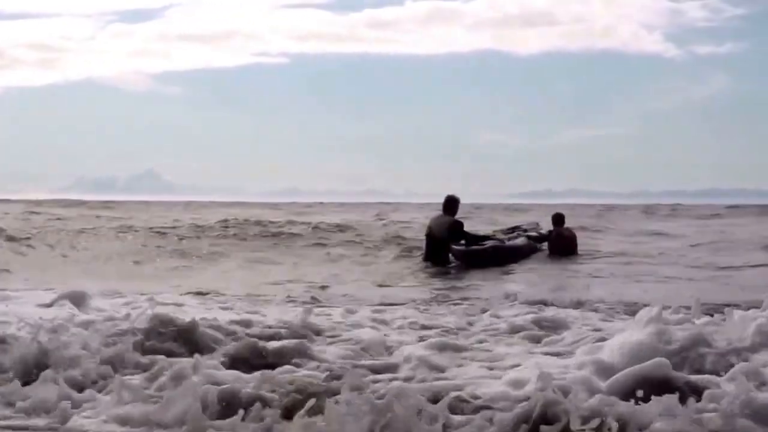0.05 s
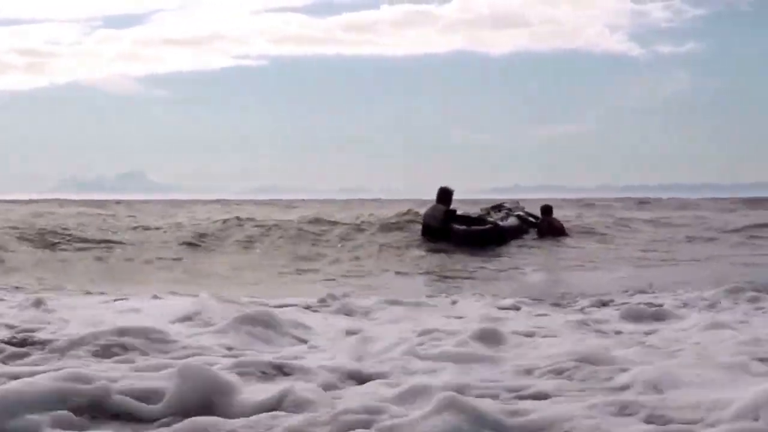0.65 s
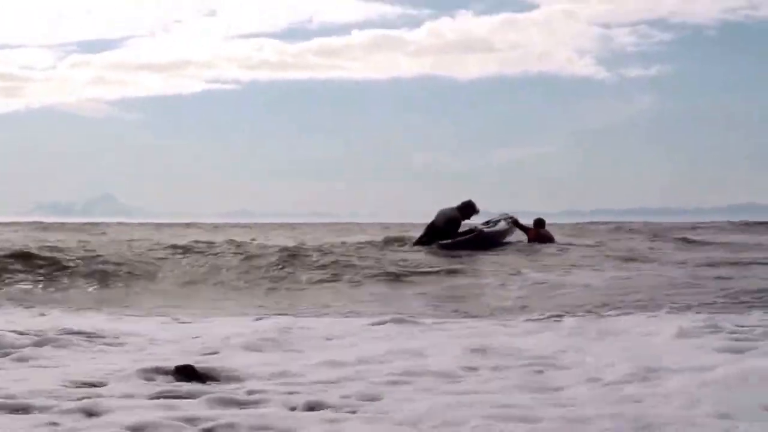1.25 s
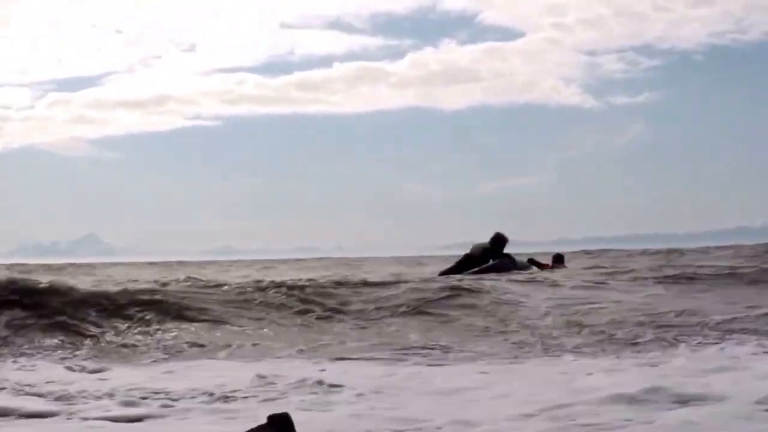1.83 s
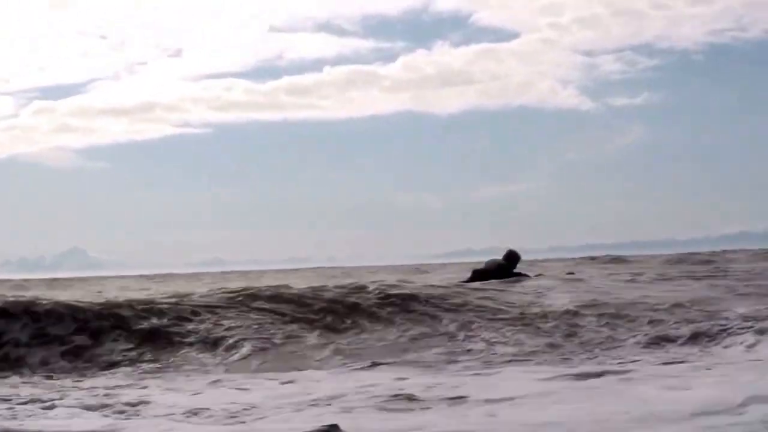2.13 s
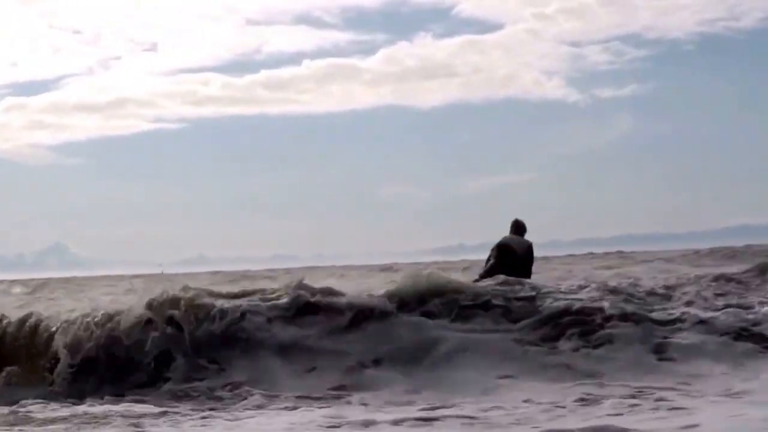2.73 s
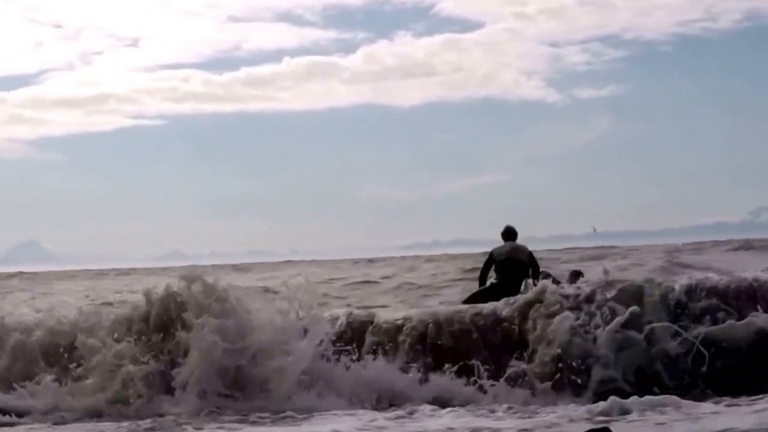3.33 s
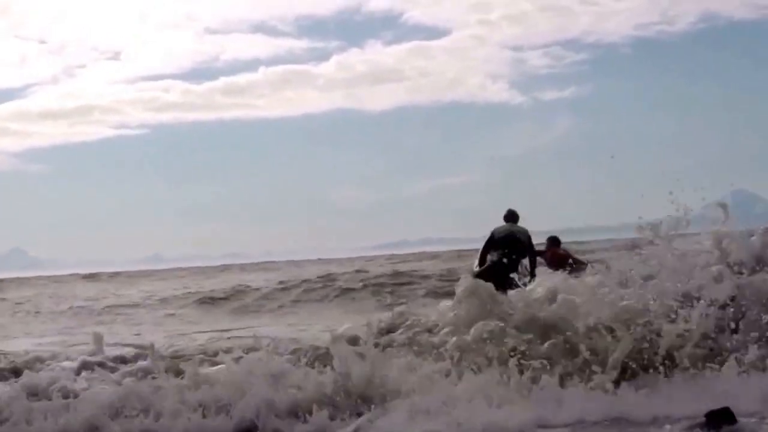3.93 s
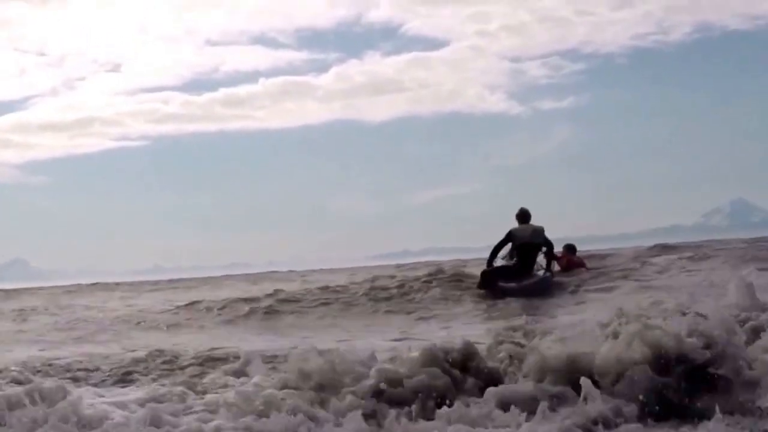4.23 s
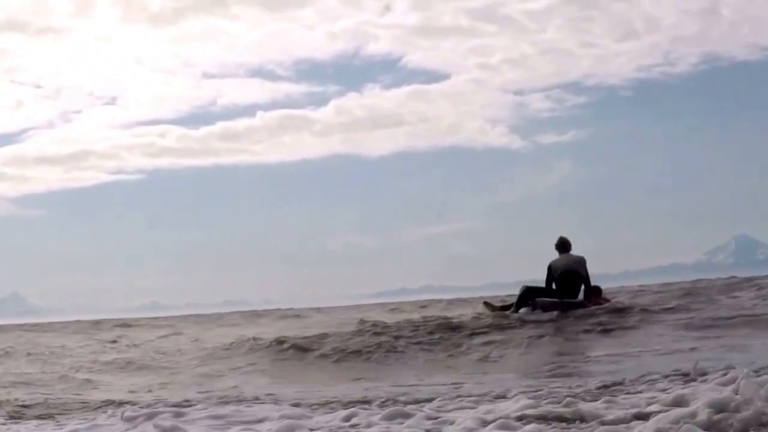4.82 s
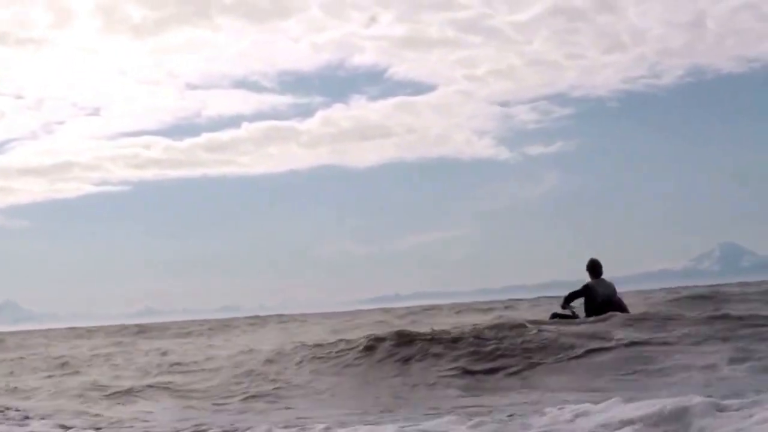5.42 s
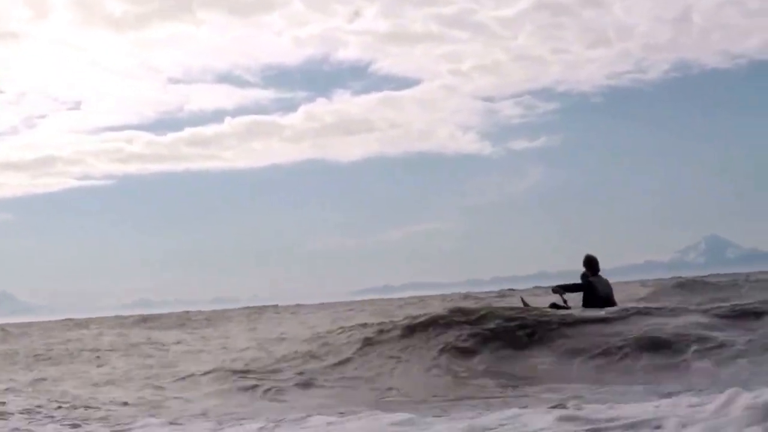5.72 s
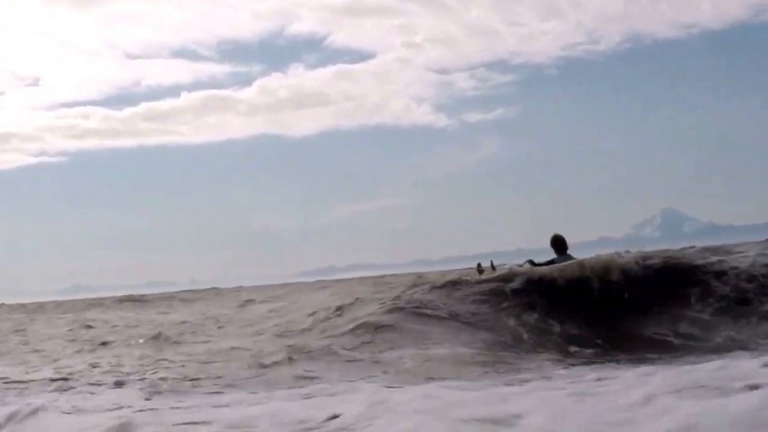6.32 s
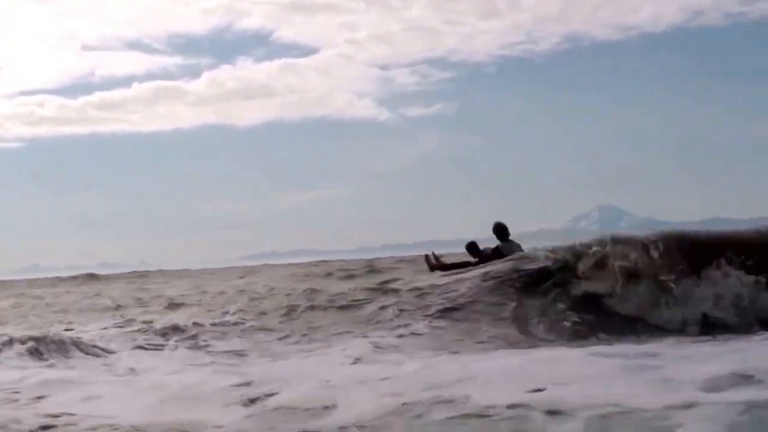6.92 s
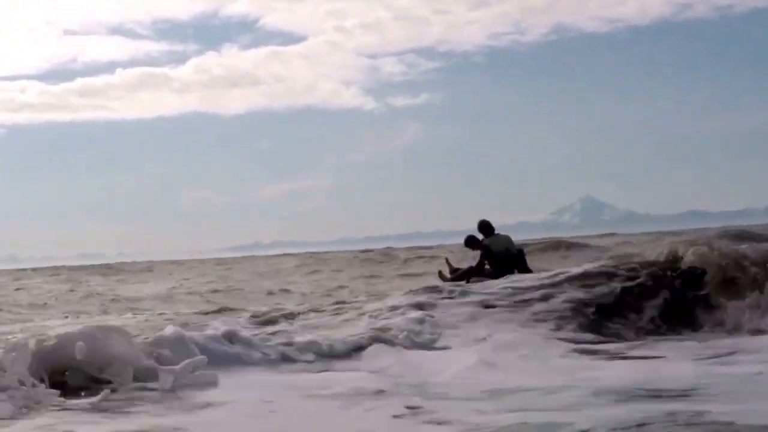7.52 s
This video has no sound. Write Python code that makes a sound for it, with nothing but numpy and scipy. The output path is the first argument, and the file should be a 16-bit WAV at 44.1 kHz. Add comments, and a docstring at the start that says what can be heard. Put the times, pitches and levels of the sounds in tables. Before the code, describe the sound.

Sea foam bubbles and washes through the shallows, heard from a microphone in a waterproof housing. Gusts add a deep rumble, and a hand knocks on the casing several times. About three seconds in, a wave curls and breaks close by, slaps down and slowly fizzes out. Three quick knocks follow, then another crest starts to spill. A thin hiss runs underneath.

```python
"""Shore break around a sea kayak, from a microphone in a waterproof housing down in the shallows.
Foam washes past, a mass of ringing bubbles, while gusts buffet the housing and a hand knocks on it.
About three seconds in, a wave curls and breaks close by, slaps down and slowly fizzes out.
Three quick knocks follow, and near seven seconds the next crest starts to spill.
The microphone hisses thinly throughout."""
import sys
import numpy as np
from scipy import signal
from scipy.fft import rfft, irfft, next_fast_len
from scipy.io import wavfile

SR = 44100
rng = np.random.default_rng(int(sys.argv[2]) if len(sys.argv) > 2 else 0)


def file_out(sig):
    """Save sig as 16-bit WAV at sys.argv[1]."""
    # one column per channel
    cols = np.atleast_2d(sig).T
    # limit, then scale
    lim = np.clip(cols, -1, 1)
    pcm = np.round(lim * 32767).astype(np.int16)
    wavfile.write(sys.argv[1], SR, pcm)


N = 337795
TIME = np.arange(N) / SR
FFT_SIZE = next_fast_len(N + 8192)
BIN_HZ = np.maximum(np.arange(FFT_SIZE // 2 + 1) * SR / FFT_SIZE, 1)


# Surges in the shallows: passing foam, the plunging wave, its spray and fizz, then the next crest.
# peak_s, level_db, rise_s, fall_s, pitch_hz, spread_octaves
SURGES = [(0.03, -50.5, 0.64, 0.85, 820, 2.07), (0.39, -56.6, 0.063, 0.48, 6280, .29),
          (1.18, -55.1, .89, 0.7, 850, 1.46), (1.54, -61, .31, 1.8, 5180, 0.84),
          (3.22, -46.3, 1.24, 1.02, 1273, 0.56), (3.45, -47, 0.51, 0.86, 2030, 0.39),
          (3.75, -48, 1.1, 1.3, 565, 1.15), (3.85, -58.5, 1.6, 0.23, 9700, .3),
          (4.0, -51.5, .6, 0.68, 3350, 0.98), (4.53, -52.5, 0.057, 0.76, 6000, 0.32),
          (4.71, -52.5, 0.55, 0.36, 1380, 1.64), (5.11, -53.5, .79, 0.3, 2800, 0.25),
          (5.53, -55.5, .16, 0.39, 4400, 0.99), (5.97, -62, .3, 3.6, 6030, 1.3),
          (6.821, -55, 0.14, 4.1, 1360, 0.49), (7.33, -51.5, .29, 4, 655, 1.12)]
# Bubble size classes, from deep churn to fine fizz; near_db sets the near bubbles against the far blur.
# low_hz, high_hz, tilt_db_per_octave, bubbles_per_s, ring_cycles, near_db
BUBBLE_SIZES = [(139, 660, -3, 200, 13, -13), (655, 1345, 0.1, 900, 13.2, -9),
                (1297, 2324, 0.4, 800, 8.9, -7.5), (2240, 2895, -3.5, 500, 12, -11.5),
                (2855, 3490, -5.5, 500, 8.7, -9), (3425, 4580, -5.5, 800, 9.8, -8.5),
                (4330, 7130, -1, 900, 15, -7), (7120, 10400, -14.5, 2500, 6.2, -9)]
# The steady wash of the sea all around, one value per bubble size: level_db
SEA_WASH = [-61.5, -62.5, -65, -65.5, -75, -68, -64, -67.5]

def surf():
    """Each surge stirs the bubble sizes near its own pitch, over a steady wash; their powers add."""
    surges = [(from_db(db) * swell(peak_s, rise_s, fall_s), pitch_hz, octaves)
              for peak_s, db, rise_s, fall_s, pitch_hz, octaves in SURGES]
    out = 0
    for (low_hz, high_hz, *texture), wash_db in zip(BUBBLE_SIZES, SEA_WASH):
        centre_hz = np.sqrt(low_hz * high_hz)
        surge_power = sum(level ** 2 * np.exp(-(np.log2(centre_hz / pitch_hz) / octaves) ** 2)
                          for level, pitch_hz, octaves in surges)
        loudness = np.sqrt(from_db(wash_db) ** 2 + surge_power)
        out += loudness * foam(low_hz, high_hz, *texture)
    return out


# Peaks and dips of the housing wall between surf and microphone: centre_hz, width_hz, gain_db
HOUSING_WALL = [(234, 60.0, -1.8), (451, 210.0, -2.5), (695, 50.0, -2.6), (739, 90.0, 2.5),
                (964, 60.0, 1.8), (1219, 150.0, 4.8), (1335, 60.0, -2.8), (1462, 110.0, 4.0),
                (1554, 50.0, -1.8), (1603, 130.0, 2.2), (2061, 170.0, 2.0), (2286, 100.0, -2.7),
                (2694, 380.0, 2.7), (3066, 160.0, 1.7), (3462, 270.0, -2.2), (4100, 440.0, 1.8),
                (5431, 270.0, 3.7), (5974, 270.0, -1.4), (6611, 560.0, 1.8), (7078, 310.0, -4.0),
                (7565, 280.0, 2.4), (8546, 850.0, 4.7)]

def foam(low_hz, high_hz, tilt_db_per_octave, bubbles_per_s, ring_cycles, near_db):
    """One size class of bubbles: near ones stand out of a blur of far ones, all heard through the wall."""
    near = from_db(near_db) * bubbles(low_hz, high_hz, bubbles_per_s, ring_cycles)
    far = rng.standard_normal(N)
    band_db = -10 * np.log10((1 + (low_hz / BIN_HZ) ** 36) * (1 + (BIN_HZ / high_hz) ** 36))
    tilt_db = tilt_db_per_octave * np.log2(BIN_HZ / low_hz)
    wall_db = sum(db / (1 + (2 * (BIN_HZ - hz) / width_hz) ** 2) for hz, width_hz, db in HOUSING_WALL)
    return coloured(near + far, band_db + tilt_db + wall_db)


def bubbles(low_hz, high_hz, bubbles_per_s, ring_cycles, pitch_count=10):
    """Bubbles of slightly uneven strength are born in loose clumps; each rings for a few cycles."""
    chance = rng.random(N)
    birth_rate = bubbles_per_s * from_db(1.5 * drift(rate_hz=9))
    births = np.flatnonzero(chance < birth_rate / SR)
    strengths = from_db(-0.5 * np.minimum(rng.exponential(1, len(births)), 4))
    strengths *= rng.choice([-1, 1], len(births))
    pitch_index = rng.integers(0, pitch_count, len(births))
    out = 0
    for k, hz in enumerate(np.geomspace(low_hz, high_hz, pitch_count)):
        clicks = np.bincount(births, strengths * (pitch_index == k), N)
        out += np.sqrt(hz) * unit_power(ring(clicks, hz, ring_cycles / hz))
    return unit_power(out)


# Lumps of water falling from the two crests: start_s, level_db, pitch_hz, decay_s
SLAPS = [(3.172, -44, 1200, 0.032), (3.2, -48, 1910, 0.017), (3.245, -43, 1270, .03),
         (3.43, -42, 1650, 0.025), (3.585, -46, 1220, 0.069), (7.255, -49.5, 1070, 0.041),
         (7.345, -49, 302, 0.035)]

def slaps(ring_cycles=14, rise_s=0.0035):
    """A falling lump of water traps a short burst of like-sized bubbles."""
    out = np.zeros(N)
    for start_s, level_db, pitch_hz, decay_s in SLAPS:
        age = np.maximum(TIME - start_s, 0)
        cloud = unit_power(ring(rng.standard_normal(N), pitch_hz, ring_cycles / pitch_hz))
        envelope = (1 - np.exp(-age / rise_s)) * np.exp(-age / decay_s)
        out += from_db(level_db) * cloud * envelope
    return out


# Single droplets close to the microphone: start_s, peak_db, pitch_hz
DROPLETS = [(0.199, -41, 3000), (1.28, -56, 4200), (1.5455, -45, 6060), (6.5406, -42, 2600),
            (6.686, -44, 4900), (6.7716, -40, 4640), (7.46, -46, 4700)]

def droplets(t60_s=0.0068):
    """Each droplet pings one tiny bubble."""
    return sum(from_db(peak_db) * ring(signal.unit_impulse(N, round(start_s * SR)), pitch_hz, t60_s)
               for start_s, peak_db, pitch_hz in DROPLETS)


# Smooth swells of wind pressure on the housing: peak_s, level_db, half_length_s
GUSTS = [(0.25, -20.5, .25), (0.852, -25.5, 0.23), (1.438, -23, 0.21), (2.066, -28.5, 0.2),
         (2.8, -24.3, 0.23), (3.055, -16.8, 0.14), (3.472, -24.5, 0.4), (4.117, -33, .1), (4.47, -24, 0.15),
         (5.59, -36, 0.063), (6.322, -34.5, 0.047), (7.03, -36, 0.051)]

def gusts(resonance_hz=22.2, wander=0.0697, lull_db=-43, waver_db=3.5):
    """Gusts pump a very low resonance of the housing, which wavers on faintly in the lulls."""
    lull = from_db(lull_db + waver_db * drift(rate_hz=5))
    swells = [from_db(db) * np.exp(-((TIME - peak_s) / half_s) ** 2) for peak_s, db, half_s in GUSTS]
    pitch_hz = resonance_hz * (1 + wander * drift(rate_hz=8.3))
    swing = np.sqrt(2) * np.sin(2 * np.pi * np.cumsum(pitch_hz) / SR)
    return swing * np.linalg.norm([lull, *swells], axis=0)


# The breeze over the water eases, freshens as the wave curls, then slackens: time_s, relative_db
BREEZE = [(0, -49), (1.7, -53.5), (3.2, -49.0), (4.6, -54), (7.66, -57.5)]
# The rumble of wind on the housing wall: frequency_hz, relative_db
BUFFET_SPECTRUM = [(20, -3.5), (32, 5.5), (52, 2), (64, 4.5), (78, -3), (92, -6.5), (115, -7), (150, -13.5),
                   (220, -28.5), (500, -53)]

def buffeting(gain_db=6.5, rise_s=0.026, fall_s=0.11):
    """The breeze buffets the wall, more so as the housing wobbles in the hand after a knock."""
    breeze = from_db(np.interp(TIME, *np.transpose(BREEZE)))
    wobbles = [from_db(wobble_db) * swell(start_s + rise_s, rise_s, fall_s)
               for start_s, *_, wobble_db in KNOCKS]
    rumble = coloured(rng.standard_normal(N), spectrum(BUFFET_SPECTRUM))
    return from_db(gain_db) * np.linalg.norm([breeze, *wobbles], axis=0) * rumble


# A hand on the housing, right at the microphone; wobble_db feeds the wind buffeting.
# start_s, tick_db, tick_cutoff_hz, rub_s, thud_db, thud_cutoff_hz, wobble_db
KNOCKS = [(0.2855, -24, 2780, 0.018, -18, 440, -49), (0.9574, -30.5, 2620, 0.0085, -29, 85, -38),
          (1.053, -38.5, 1200, 0.004, -39, 85, -51), (2.4114, -32, 2410, 0.0055, -37, 70, -42.5),
          (2.613, -36.5, 2400, 0.024, -26.7, 525, -48), (6.358, -34.5, 960, 0.0023, -34, 190, -52),
          (6.4037, -31, 860, .002, -34.5, 185, -48), (6.448, -26, 890, 0.0029, -30, 203, -46)]
# Resonances of the knocked housing: pitch_hz, gain_db, t60_s
HOUSING_MODES = [(64, -14, 0.19), (87.4, -3, 0.18), (112.6, -1, 0.12), (178, -11.5, 0.23),
                 (261.6, -5.5, 0.15), (304, -2.5, 0.062), (395.6, -10.5, 0.11), (604, -11.5, 0.067),
                 (744, -5.5, 0.054), (954, -5.5, 0.05), (1200, -3, 0.028), (1283, -2.5, 0.048),
                 (1343, 0, 0.022), (2080, -13, 0.019), (2440, -15, 0.022), (2880, -16, .02)]

def knocks(thud_lag_s=0.00186, rub_db=-26, tick_highpass_hz=380):
    """A touch ticks and rubs on the stiff wall; then the whole housing takes the soft push and thuds."""
    force = np.zeros(N)
    age = np.arange(SR // 8) / SR
    blow = signal.unit_impulse(len(age))
    for start_s, tick_db, tick_cutoff_hz, rub_s, thud_db, thud_cutoff_hz, _ in KNOCKS:
        rub = from_db(rub_db) * rng.standard_normal(len(age)) * np.exp(-(age / rub_s) ** 2)
        touch = filtered(blow + rub, 6, tick_cutoff_hz, "low")
        tick = from_db(tick_db) * filtered(touch, 4, tick_highpass_hz, "high")
        thud = from_db(thud_db) * filtered(blow, 3, thud_cutoff_hz, "low")
        for onset_s, push in (start_s, tick), (start_s + thud_lag_s, thud):
            start = round(onset_s * SR)
            force[start:start + len(age)] += push
    return sum((-1) ** k * from_db(gain_db) * ring(force, pitch_hz, t60_s)
               for k, (pitch_hz, gain_db, t60_s) in enumerate(HOUSING_MODES))


# The microphone's own noise: frequency_hz, relative_db
HISS_SPECTRUM = [(3000, -28), (8500, -16), (10000, -7), (10600, -2.5), (11400, -7.5), (11900, -6),
                 (12500, -2), (12950, 0), (13500, -3.5), (14200, -4), (15200, -10)]

def microphone_hiss(hiss_db=-64.6, whine_db=-62.9, whine_hz=12295, whine_width_hz=160):
    """Thin microphone hiss with a narrow, noisy whine on top."""
    hiss = coloured(rng.standard_normal(N), spectrum(HISS_SPECTRUM))
    whine_shape_db = -20 * np.log10(1 + ((BIN_HZ - whine_hz) / whine_width_hz) ** 2)
    whine = coloured(rng.standard_normal(N), whine_shape_db)
    return from_db(hiss_db) * hiss + from_db(whine_db) * whine


# Fine crackle of the electronics inside the housing: frequency_hz, relative_db
CRACKLE_SPECTRUM = [(9000, -30), (12000, -14), (12800, 0), (14200, -4), (15200, -10)]

def electronics_crackle(level_db=-70.3, pulse_hz=239.76, uneven_db=5.5):
    """Faint regular ticks from the electronics, each of a different size."""
    onsets = np.arange(0, N - 1, SR / pulse_hz).round().astype(int)
    sizes = from_db(uneven_db * np.clip(rng.standard_normal(len(onsets)), -2, 2))
    ticks = np.bincount(onsets, sizes * rng.choice([-1, 1], len(onsets)), N)
    return from_db(level_db) * coloured(ticks, spectrum(CRACKLE_SPECTRUM))


def from_db(db):
    """Decibels to gain."""
    return 10 ** (np.asarray(db) / 20)


def unit_power(x):
    """Scale to a mean square of 1."""
    return x / np.sqrt(np.mean(x ** 2) + 1e-20)


def spectrum(points):
    """Join (frequency_hz, relative_db) points on a log-frequency axis."""
    hz, db = np.transpose(points)
    return np.interp(np.log(BIN_HZ), np.log(hz), db)


def coloured(x, curve_db):
    """Shape a steady sound's spectrum and return it at unit power."""
    return unit_power(irfft(rfft(x, FFT_SIZE) * from_db(curve_db), FFT_SIZE)[:N])


def filtered(x, order, cutoff_hz, kind):
    """A low-pass or high-pass with a flat passband."""
    return signal.sosfilt(signal.butter(order, cutoff_hz, kind, fs=SR, output="sos"), x)


def drift(rate_hz):
    """Slow random wandering at unit power."""
    return coloured(rng.standard_normal(N), -40 * np.log10(np.hypot(1, BIN_HZ / rate_hz)))


def ring(clicks, pitch_hz, t60_s):
    """A unit click starts a sine of height 1 that falls 60 dB in t60_s."""
    decay = from_db(-60 / (t60_s * SR))
    step = 2 * np.pi * pitch_hz / SR
    return signal.lfilter([0, np.sin(step)], [1, -2 * decay * np.cos(step), decay ** 2], clicks + 1e-18)


def swell(peak_s, rise_s, fall_s):
    """Grow exponentially to 1 at peak_s, then die away."""
    return np.exp(np.minimum((TIME - peak_s) / rise_s, (peak_s - TIME) / fall_s))


def scene():
    """Water, wind and handling meet at one microphone in the shallows, over its own faint noise."""
    water = surf() + slaps() + droplets()
    wind = gusts() + buffeting()
    return (water + wind + knocks() + microphone_hiss() + electronics_crackle())[None]


def record(dry):
    """The treble is cut steeply above 15250 Hz."""
    return signal.sosfilt(signal.ellip(12, 0.1, 80, 15250, fs=SR, output="sos"), dry)


dry = scene()
out = record(dry)
file_out(out)
```